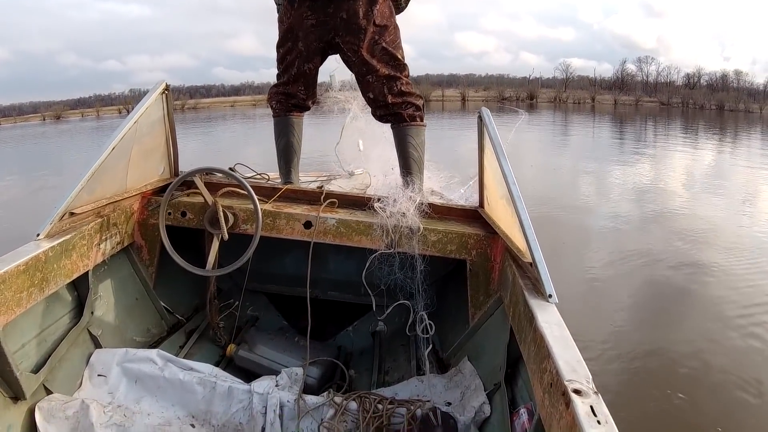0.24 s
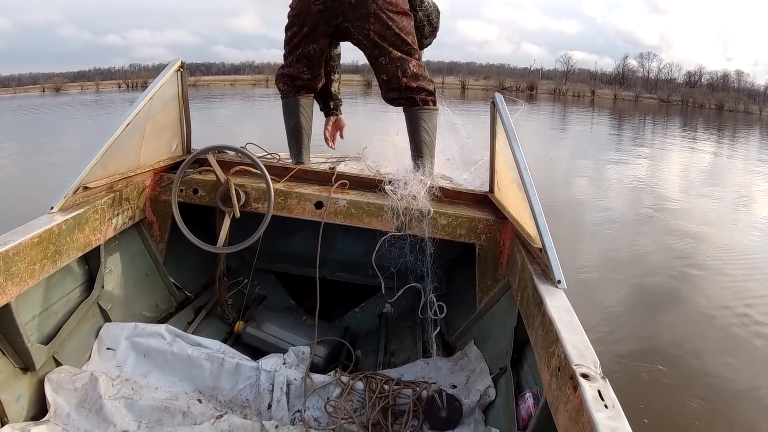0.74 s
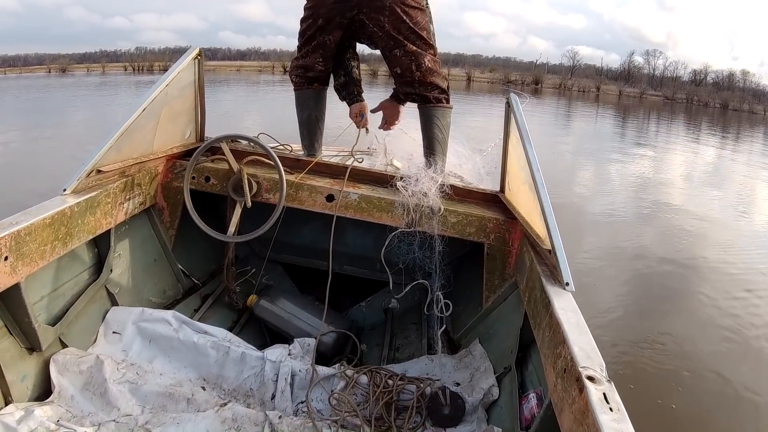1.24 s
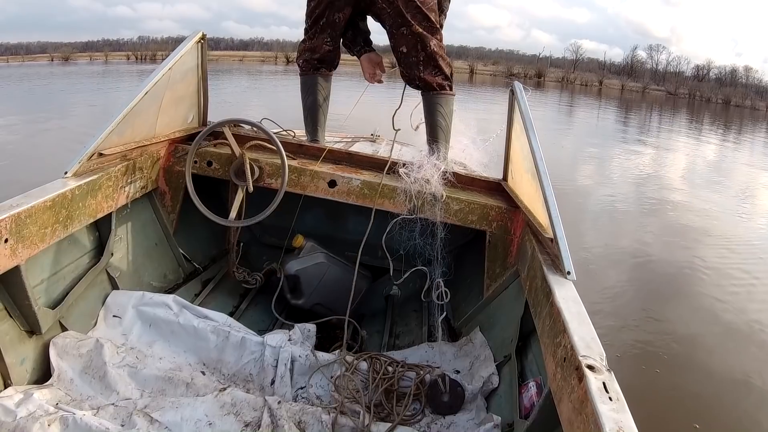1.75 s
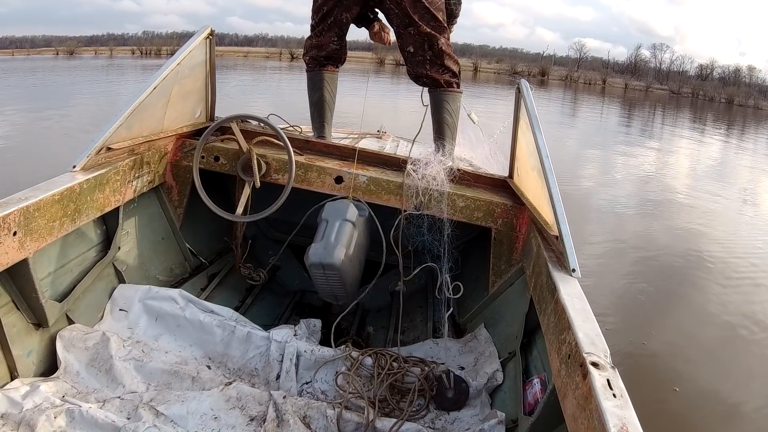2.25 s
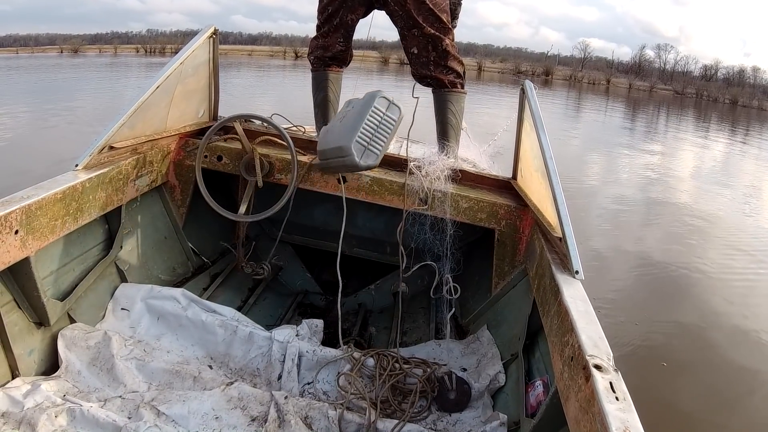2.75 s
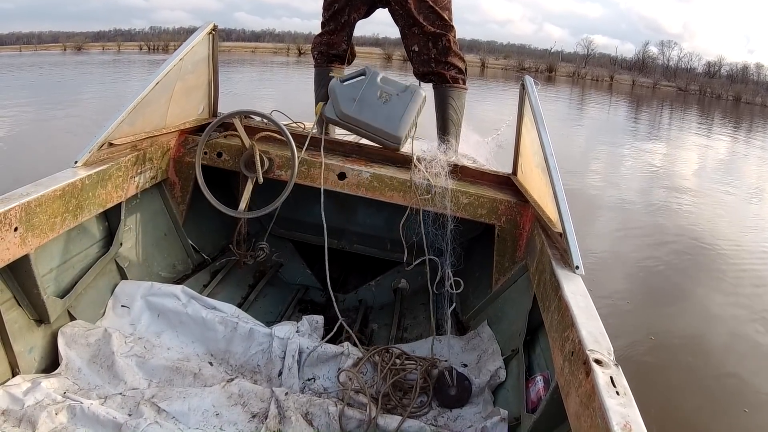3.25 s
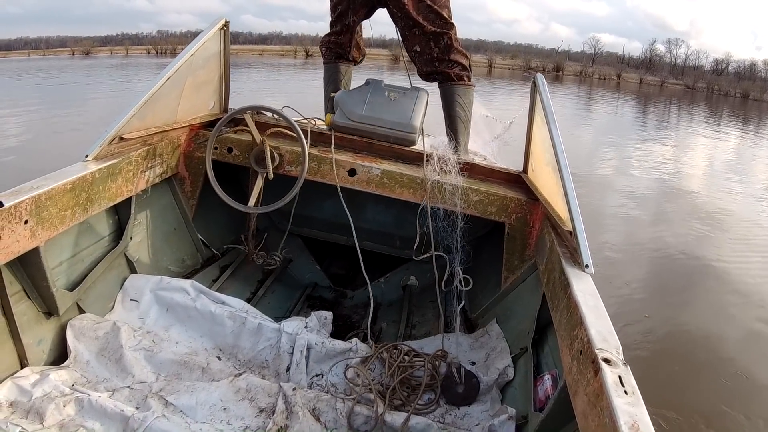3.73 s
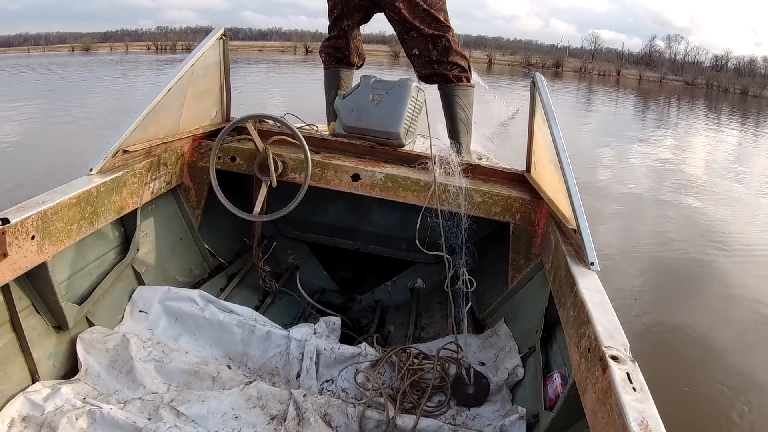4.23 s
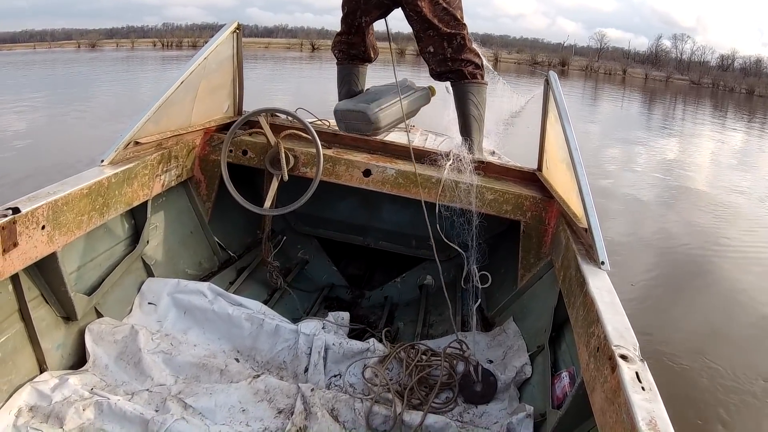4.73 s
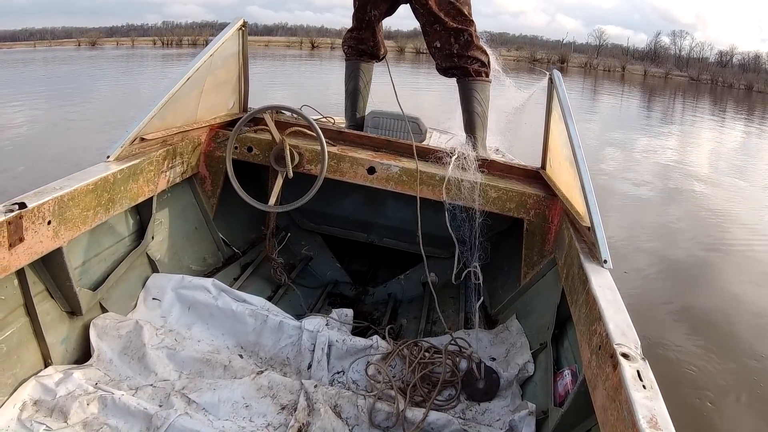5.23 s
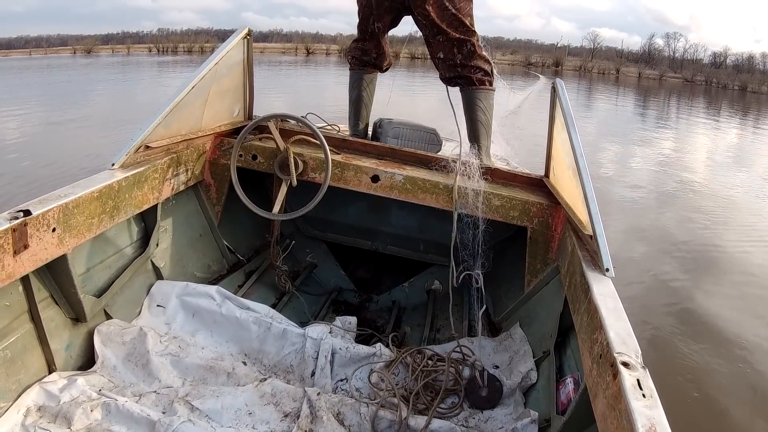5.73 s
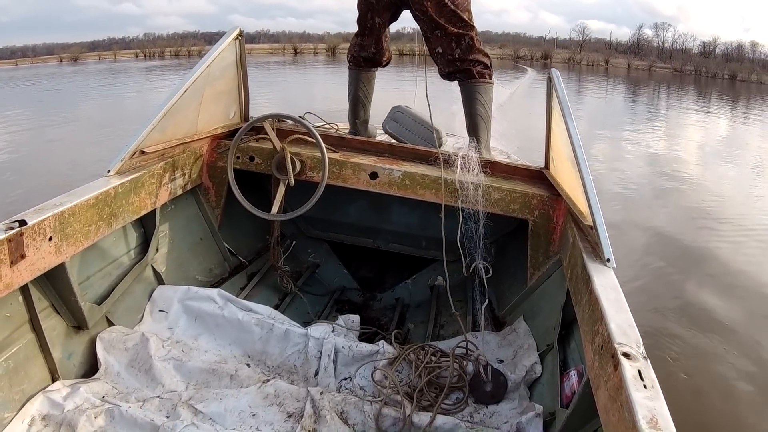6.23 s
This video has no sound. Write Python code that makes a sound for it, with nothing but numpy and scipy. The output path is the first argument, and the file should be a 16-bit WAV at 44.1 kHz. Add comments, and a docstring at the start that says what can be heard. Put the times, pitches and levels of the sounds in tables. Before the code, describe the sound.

A close microphone sits in a small metal boat on a calm river, with a faint steady hush and low, bubbling laps and gulps beneath the bow. From 0 to 1.8 s, wet net drips in a fast, uneven, bright patter, with soft dull flops and a faint boot bump near 0.6. Around 1.9 s a hollow plastic float stirs; sharp knocks hit at 2.2 and, loudest, 2.5 s, slightly distorted. From 3.1 to 3.9 s it clatters repeatedly, hollow and hard, with gritty dragging scrapes, strongest near 3.3 and 3.8. The dragging fades after 4 s; small wet flops come at 4.3 and 4.6, water gulps at 4.8 to 5. A boot thuds at 5.2 with light float taps, another bumps at 5.75, drops patter briskly, and a final hollow knock lands at 6.3 amid rising scraping to about 6.5 s.

```python
"""Wet net over the bow

A wet fishing net is paid out over the bow of a small metal boat. Its cord drags a hollow plastic float
out of the hull, knocking and scraping, while boots bump and wet net flops: random contacts ring filters and tones.
Drops patter off the net as short bursts of tiny contacts. The river laps as filtered noise, small
bubble tones and gulps, over a faint hush of noise. The hardest knocks overload the microphone."""
import sys
import numpy as np
from scipy import signal
from scipy.fft import rfft, irfft, next_fast_len
from scipy.io import wavfile
from scipy.ndimage import map_coordinates

SR = 44100
rng = np.random.default_rng(int(sys.argv[2]) if len(sys.argv) > 2 else 0)


def persist_wave(psi):
    """Save psi, clipped to +-1, as 16-bit WAV."""
    counts = np.round(np.clip(psi, -1, 1) * 32767).astype(np.int16)
    wavfile.write(sys.argv[1], SR, np.atleast_2d(counts).T)


N = 285768  # samples in the scene
SPAN = 32768  # samples in the frequency grid of every filter
TOP_HZ = 15850  # nothing is heard above this

# Table levels are starting points: the functions below add trims and chance.
# The float hits the boat: (time [s], level [dB], weight: boom over the level [dB],
# hardness: crack over the level [dB], basic time to fade by 60 dB [s])
FLOAT_KNOCKS = [(1.857, -49.5, -11.5, -8, 0.2), (2.173, -31.5, -25, -2, 0.18),
                (2.270, -45, -0.5, 8.5, 0.32), (2.295, -37.5, -9.5, -13, .32),
                (2.493, -26.5, -5.5, 0, 0.21), (2.678, -44.5, -4, 0, 0.23), (3.061, -49, -8.5, -5.5, .24),
                (3.116, -35.5, -12, 2, .13), (3.206, -49, -15, -7, .15), (3.263, -30, -17.5, -2.5, .19),
                (3.374, -34.5, -14, -10.5, 0.18), (3.428, -49, -5, -0.5, 0.37), (3.471, -47, 0, 6, 0.29),
                (3.616, -42, -26, -12, 0.25), (3.660, -37.5, -4.5, 6.5, 0.32),
                (3.839, -27.5, -22, -0.5, .2), (3.955, -51, -28, 0, .17), (5.216, -43, 1, -3.5, 0.19),
                (5.296, -48, 0, -44, 0.099), (5.328, -50.5, -2, -31, 0.13), (6.297, -32.5, -2, -1, .25)]
# Wet net flops on the deck: (time [s], level [dB], hollow ring over the level [dB],
# spray over the level [dB], rise [s])
NET_FLOPS = [(.272, -54, -24, -31, 0.018), (0.411, -49.5, -0.5, -18, 0.0073), (.530, -56.5, -3, -8, .025),
             (.558, -44, -1, -7.5, 0.013), (.736, -57, 0, -3.5, 0.0022), (.935, -53.5, -20, -10, 0.012),
             (1.025, -58.5, 2, -4.5, 0.01), (1.163, -56.5, -9, -15, 0.0061), (1.240, -61, 12, -25, 0.0087),
             (1.609, -48.5, -16, -14, .004), (2.129, -50, -31, -9, 0.007), (4.325, -56.5, -12, -5, 0.0015),
             (4.565, -49.5, -11, -12, 0.0045)]
# Boots shift and bump on the bow: (time [s], level [dB])
BOOT_STEPS = [(0.636, -62), (2.722, -50.5), (2.826, -60.5), (3.076, -60), (4.210, -66), (5.176, -42.5),
              (5.375, -61), (5.579, -60), (5.747, -46.5), (5.946, -60.5), (6.195, -52.5)]
# A boot's sound: (ring over the boom [dB], clack over the boom [dB], crack over the boom [dB])
STEP_TONE = (-4.5, -16, -14)
# Float and hull together, broad colour: (frequency [Hz], level [dB])
BODY_COLOUR = [(25, -23), (70, -22.5), (140, -18), (220, -7), (480, -6.5), (750, -2.5), (1050, -11),
               (1450, -13.5), (2100, -7.5), (3300, -14.5), (6200, -10), (7100, -20.5), (9500, -34.5),
               (15500, -38)]
# Float and hull together, resonances: (frequency [Hz], width [Hz], lift [dB])
BODY_MODES = [(80, 7, 8.9), (188, 29, 4), (246.6, 23, 5.2), (418, 8.8, 9.5), (602.6, 21, 6),
              (629, 20.4, 8.2), (768, 15, 6.6), (852, 59, 3.3), (948, 26, 2.6), (1176, 19, 5.3),
              (1649, 33, 3.3), (1717, 100, 3.1), (2014, 130, 3.6), (2182, 68, 4.3), (2300, 76, 6.3),
              (2470, 72, 0.43), (2740, 24, 1.5), (3204, 200, 3.8), (5120, 60, 4.4), (6050, 100, 5.2),
              (6160, 80, 1.8), (6470, 72, 4.5), (7600, 130, 10.4), (8220, 220, 11)]
# Thump, boom, ring, clack and crack: (from [Hz], to [Hz])
PART_BANDS = [(42, 140), (150, 480), (480, 1000), (1100, 3600), (3800, 20000)]
# Fade time of thump, boom, ring, clack and crack: (multiple of the blow's fade time [ratio])
PART_LIFE = [1.28, 1.69, 1.23, 1.04, 0.83]
# The hollow float's walls: (frequency [Hz], level [dB], time to fade by 60 dB [s])
FLOAT_WALLS = [(557.3, -11, 0.32), (648.6, -1, 0.095), (769.5, -4.5, 0.05), (836, -20, 0.13)]
# The hull's panels: (frequency [Hz], level [dB], time to fade by 60 dB [s])
HULL_PANELS = [(183, -6, 0.15), (245.2, -7, 0.29), (363.4, -4.5, 0.19)]
# The net slides out, now stronger, now almost silent: (time [s], level [dB])
NET_DRAG = [(0, -83), (.5, -71.5), (1.2, -73.5), (1.55, -83), (1.82, -64.5), (2.2, -71.5), (2.75, -69.5),
            (3.2, -65.5), (3.9, -57), (4.45, -67), (5.0, -81), (5.35, -69), (5.6, -93), (6.1, -70.5),
            (6.48, -60)]
# Float and mesh scrape over the deck: (time [s], length [s], level [dB])
DECK_SCRAPES = [(0.566, 0.12, -57), (2.243, .22, -53), (2.82, 0.12, -59), (3.317, 0.17, -51.5),
                (3.69, 0.037, -53), (4.092, 0.18, -59), (4.518, 0.11, -60.5), (5.173, 0.038, -49),
                (5.72, 0.04, -58.5), (6.212, 0.1, -57)]
# Broad colour of the sliding: (frequency [Hz], level [dB])
SLIDE_COLOUR = [(300, -24.5), (1000, 2.5), (1450, -3), (2200, 3.5), (3100, -3), (4800, 2), (6300, 3.5),
                (7200, -6), (10500, -23), (13500, -10), (16000, -22)]
# The fattest drops off the net: (time [s], level [dB], ping of the landing spot over the level [dB])
FAT_DROPS = [(.030, -41.5, -22.5), (0.164, -51.5, -11.5), (.313, -44, -12), (0.354, -50, -9),
             (0.768, -45.5, -16.5), (.819, -46.5, -8.5), (0.92, -48, -12), (0.969, -45.5, -11),
             (1.053, -55, -6), (1.138, -54, -7), (1.181, -46, -9), (1.227, -54, -10), (1.326, -53, -13),
             (1.48, -44.5, -11.5), (1.52, -50.5, -9), (1.712, -54, -2), (1.76, -44, -16.5),
             (1.918, -48, -14), (1.969, -45.5, -9), (2.012, -49.5, -15), (2.062, -50, -29),
             (2.434, -44, -21), (2.871, -42.5, -19.5), (2.911, -50.5, -10), (2.966, -44.5, -16),
             (3.014, -49.5, -10.5), (3.163, -40, -18), (4.373, -55, -12), (4.678, -51.5, -16),
             (4.88, -50, -22), (5.062, -55, -33), (5.116, -54, -11.5), (5.332, -48, -10),
             (5.378, -44.5, -18), (5.42, -52.5, -16), (5.514, -53.5, -5), (5.662, -48.5, -16),
             (5.705, -50.5, -9.5), (5.799, -56, -8.5), (5.901, -51.5, -11.5), (5.950, -48, -7.5),
             (5.993, -51, -17), (6.037, -54.5, -18), (6.08, -48, -10), (6.23, -40, -19), (6.275, -53, -2.5),
             (6.42, -46.5, -24), (6.47, -52.5, -6.5)]
# A drop's spatter, broad colour: (frequency [Hz], level [dB])
SPATTER_COLOUR = [(1200, -47), (2100, -9.5), (3000, -26.5), (4500, -3), (6400, -12), (8400, -14),
                  (10500, -25.5), (13500, -17), (16000, -19)]
# A drop's spatter, resonances: (frequency [Hz], width [Hz], lift [dB])
SPATTER_MODES = [(2150, 76, 22), (2260, 88, 13), (3340, 47, 8), (3400, 100, 21), (3637, 70, 20.6),
                 (4160, 62, 12.4), (4505, 76, 11), (4350, 39, 4.3), (4734, 56, 12), (4810, 56, 14.7),
                 (4960, 120, 8.4), (5610, 76, 15.3), (5710, 100, 5.7), (6250, 70, 12.5), (6248, 69, 8.5),
                 (6570, 130, 17.5), (7373, 73, 13.7), (7630, 130, 8.3), (8035, 75, 19)]
# Tones of the spot a drop lands on: (frequency [Hz], width [Hz], level [dB])
PING_MODES = [(2668, 51, 15), (2600, 19, -10), (2740, 34, 2)]
# Ripples under the bow: (time [s], level [dB], middle bubble pitch [Hz])
RIPPLES = [(0, -66.5, 603), (.3, -63, 591), (.62, -58, 525), (.88, -69, 624), (1.12, -75, 742),
           (1.35, -66, 691), (1.57, -71, 646), (1.75, -65, 686), (2.5, -57, 662.5), (2.87, -64.5, 632),
           (3.5, -57, 705), (4.45, -60.5, 702), (4.77, -55.5, 729), (5.0, -66.5, 711), (5.3, -58.5, 683),
           (5.55, -61, 663), (6.15, -66.5, 667.6), (6.48, -60.5, 706)]
# Single wavelets slosh against the bow: (time [s], length [s], level [dB])
WAVELETS = [(0.333, 0.069, -57.5), (0.661, 0.052, -53), (0.957, 0.15, -59), (1.164, .14, -54),
            (2.478, 0.055, -48), (5.028, 0.037, -58.5), (5.886, .03, -67)]
# Broad colour of the water's murmur: (frequency [Hz], level [dB])
MURMUR_COLOUR = [(35, -96), (60, -4), (141, -18), (177, -17.5), (243, -26), (292, -15), (385, -14),
                 (422, -1.5), (514, -28.5), (643, 7.5), (794, -2.5), (955, -18), (1400, -38), (1820, -77),
                 (3080, -120)]
# Air pockets that gulp under the bow: (time [s], pitch [Hz], level [dB])
AIR_GULPS = [(.069, 424, -62.5), (.17, 436, -66), (.36, 425, -59), (0.439, 427, -53), (.824, 439, -62.5),
             (1.344, 435, -66), (1.525, 430, -65.5), (4.763, 735, -56), (4.927, 434, -55),
             (5.045, 667, -60.5)]
# Broad colour of the hush over the water: (frequency [Hz], level [dB])
AIR_COLOUR = [(25, -23), (100, -9), (400, 0.5), (750, -8), (1300, -16.5), (2200, -8.5), (3500, -16.5),
              (6000, -15), (10000, -30), (15000, -22.5)]

# A knock of fade time CONTACT_T60 rises in CONTACT_S; a glancing blow both swells and lasts longer
CONTACT_S, CONTACT_T60 = 0.0016, 0.2  # seconds
CLACK_SHARE = 0.28  # of a knock's hardness also lifts the shell's clack
FLOP_BOOM_DB, FLOP_T60 = -13.5, 0.26  # boom over the ring; basic fade time in seconds
STEP_RISE_S, STEP_T60 = 0.011, 0.28  # seconds
SCRAPE_RISE_S, SCRAPE_T60 = 0.0067, 0.21  # seconds
LAP_RISE_S, LAP_T60 = 0.017, 0.15  # seconds
DROPS_PER_S = 20.2  # approximate beat of the trickle
SMALL_DROP_DB, SMALL_PING_DB, DROP_SCATTER_DB = -63.5, -12.5, 4.5  # the lesser drops in between


def knocks(wall_db=-1, rumble_db=-2.5, hollow_db=-1, thump_db=-14, heavy_db=-47):
    """Each blow shakes float and hull in five bands, and also rings the float's walls and hull's panels."""
    out = np.zeros(N)
    t = np.arange(SPAN // 2) / SR
    body = colour(BODY_COLOUR, BODY_MODES)
    responses = [ringing(body * band(lo, hi)) for lo, hi in PART_BANDS]
    for s, boom_db, ring_db, clack_db, crack_db, rise, t60 in blows():
        # the thump weakens faster than the boom below the heavy level
        deep_db = boom_db + thump_db + 0.5 * min(boom_db - heavy_db, 0)
        levels = [deep_db, boom_db, ring_db, clack_db, crack_db]
        parts = []
        for db, response, life in zip(levels, responses, PART_LIFE):
            envelope = strike(t, rise, t60 * life)
            parts.append(amp(db) * burst(envelope, response, per_second=12000))
        thump, boom, ring, clack, crack = parts
        rattle = through(clack + crack, spot(depth_db=2.5, spacing_hz=220))
        # a slow push barely rings the walls
        wall_gain = amp(ring_db + wall_db) / (1 + rise / 0.018)
        walls = chime(FLOAT_WALLS, t, rise) * wall_gain
        panels = chime(HULL_PANELS, t, rise) * amp(boom_db)
        low = thump + amp(rumble_db) * boom + amp(hollow_db) * ring
        add(out, s, low + rattle + walls + panels)
    return out


def blows():
    """Every contact with the boat, as (time, boom dB, ring dB, clack dB, crack dB, rise s, fade s)."""
    hits = []
    for s, db, weight, hardness, t60 in FLOAT_KNOCKS:
        rise = CONTACT_S * (t60 / CONTACT_T60) ** 2
        hits.append((s, db + weight, db, db + CLACK_SHARE * hardness, db + hardness, rise, t60))
    for s, db, hollow, spray, rise in NET_FLOPS:
        ring_db = db + hollow
        hits.append((s, ring_db + FLOP_BOOM_DB, ring_db, db, db + spray, rise, FLOP_T60))
    for s, db in BOOT_STEPS:
        hits.append((s, db, *(db + np.array(STEP_TONE)), STEP_RISE_S, STEP_T60))
    return hits


def chime(modes, t, rise):
    """Fading tones; the spot that is hit decides, here by chance, which speaks loudest."""
    total = np.zeros(len(t))
    for hz, db, life in modes:
        gain = amp(db + 3.5 * rng.standard_normal())
        tone = np.sin(2 * np.pi * (hz * t + rng.random()))
        total += gain * strike(t, rise, life) * tone
    return total


def sliding():
    """Wet mesh and plastic catch and slip over the deck in small grains, louder during each scrape."""
    level = strokes(NET_DRAG, DECK_SCRAPES, SCRAPE_RISE_S, SCRAPE_T60)
    catches = grains(N, per_second=1800) * amp(2.7 * wobble(70))
    scrape = unit(through(catches, ringing(colour(SLIDE_COLOUR, BODY_MODES))))
    return level * amp(1.15 * wobble(17)) * scrape


def drips(spatter_db=-9, ping_db=2, centre_s=0.0158, spread_s=0.0057):
    """Each drop swells into a brief spatter and pings the spot it lands on, never twice quite alike."""
    out = np.zeros(N)
    t = np.arange(SR // 8) / SR
    spatter = ringing(colour(SPATTER_COLOUR, SPATTER_MODES))
    splat = np.exp(-0.5 * ((t - centre_s) / spread_s) ** 2)
    for s, drop_db, spot_db in trickle():
        stretched = t * (1 + 0.012 * rng.standard_normal())  # shifts all ping pitches a little
        ping = np.zeros(len(t))
        for hz, width, db in PING_MODES:
            gain = amp(db + 3.3 * rng.standard_normal())
            t60 = np.log(1000) / (np.pi * width)  # a narrow resonance rings longer
            ping += gain * strike(t, 0.0016, t60) * np.sin(2 * np.pi * hz * stretched)
        landing = through(spatter, spot(depth_db=3, spacing_hz=500))
        add(out, s - 0.01, amp(drop_db + spatter_db) * burst(splat, landing, per_second=2400))
        add(out, s - 0.012, amp(drop_db + spot_db + ping_db) * burst(splat, ping, per_second=1400))
    return out


def trickle():
    """All drops as (time, dB, ping dB): small ones fill each gap between fat ones at an even beat."""
    drops = list(FAT_DROPS)
    for this, following in zip(FAT_DROPS, FAT_DROPS[1:]):
        beat_count = round((following[0] - this[0]) * DROPS_PER_S)
        for s in np.linspace(this[0], following[0], beat_count + 1)[1:-1]:
            db = SMALL_DROP_DB + DROP_SCATTER_DB * rng.standard_normal()
            drops.append((s, db, SMALL_PING_DB))
    return drops


def lapping(murmur_db=-4, bubble_db=-3, bubbles_per_second=80, swell_db=2, swells_per_second=9):
    """Ripples murmur against the hull, shedding small bubbles; now and then a pocket of air gulps."""
    when, _, pitch_hz = np.transpose(RIPPLES)
    t = np.arange(SPAN // 4) / SR
    bubbles = np.zeros(N)
    count = int(bubbles_per_second * N / SR)
    for index, (late, size, strength) in enumerate(rng.standard_normal((count, 3))):
        s = (index + 0.5 * late) / bubbles_per_second
        hz = np.interp(s, when, pitch_hz) * np.exp(0.102 * size)
        tone = strike(t, rise=0.0035, t60=0.26) * np.sin(2 * np.pi * hz * t)
        add(bubbles, s, amp(2 * strength) * tone)
    # the hollow under the bow passes only the middle pitches
    bubbles = unit(through(bubbles, ringing(band(357, 884, order=12))))
    water = ringing(colour(MURMUR_COLOUR) * band(120, 1100, order=3))
    murmur = unit(through(grains(N, per_second=990), water))
    level = strokes([row[:2] for row in RIPPLES], WAVELETS, LAP_RISE_S, LAP_T60)
    swell = amp(swell_db * wobble(swells_per_second))
    out = level * swell * (amp(murmur_db) * murmur + amp(bubble_db) * bubbles)
    for s, hz, db in AIR_GULPS:
        gulp = strike(t, rise=0.015, t60=0.089) * np.sin(2 * np.pi * hz * t)
        add(out, s, amp(db + 6.5) * gulp)
    return out


def river_air(db=-73):
    """The faint steady hush over open water: noise shaped by a fixed colour."""
    return amp(db) * unit(through(rng.standard_normal(N), ringing(colour(AIR_COLOUR))))


def cockpit(x, t60=0.054, share=0.16, count=16):
    """Close metal walls throw the treble straight back as a short, diffuse echo."""
    t = np.arange(SPAN // 4) / SR
    treble = band(1000, 20000, order=3)
    # share is the part of the treble's energy that comes by way of the walls
    out = through(x, ringing(np.sqrt(1 - share * treble ** 2)))
    tone = ringing(treble)
    # fresh random echoes blend into one another, so no single one colours the whole scene
    for place in np.linspace(0, N, count + 1):
        echo = through(rng.standard_normal(len(t)) * strike(t, 0.0011, t60), tone)
        echo = echo / np.linalg.norm(echo)
        near = np.sqrt(np.maximum(1 - np.abs(np.arange(N) - place) * count / N, 0))
        heard = np.flatnonzero(near)
        reflected = signal.fftconvolve((x * near)[heard], echo)
        add(out, heard[0] / SR, np.sqrt(share) * reflected)
    return out


def spot(depth_db, spacing_hz):
    """A new contact point favours some resonances and starves others."""
    place = np.fft.rfftfreq(SPAN, 1 / SR) / spacing_hz
    favour = map_coordinates(rng.standard_normal(256), [place], mode="mirror")
    gain = amp(depth_db * favour)
    return ringing(gain / np.sqrt(np.mean(gain ** 2)))


def strike(t, rise, t60):
    """Swell to 1 over the rise time, then fade by 60 dB in t60 seconds."""
    rise = max(rise, 1e-4)
    return np.minimum(t / rise, 1) * amp(-60 * np.maximum(t - rise, 0) / t60)


def strokes(curve, rows, rise, t60):
    """Gain over time: a slow level curve, with strokes that swell, hold and fade added as energy."""
    t = np.arange(N) / SR
    level = amp(np.interp(t, *np.transpose(curve)))
    for s, length, db in rows:
        fade_db = -60 * np.maximum(t - s - length, 0) / t60
        stroke = amp(db + fade_db) * np.clip((t - s) / rise, 0, 1)
        level = np.hypot(level, stroke)
    return level


def grains(size, per_second):
    """Tiny contacts of random strength at random moments."""
    return rng.standard_normal(size) * (rng.random(size) < per_second / SR)


def burst(envelope, response, per_second):
    """A flurry of contacts rings a body, with the energy of the envelope."""
    sound = through(envelope * grains(len(envelope), per_second), response)
    return unit(sound) * np.sqrt(np.mean(envelope ** 2))


def wobble(rate):
    """A smooth random curve through the given number of random points a second."""
    points = rng.standard_normal(int(N * rate / SR) + 4)
    return map_coordinates(points, [np.arange(N) * rate / SR])


def colour(points, modes=()):
    """Gain per frequency: a broad curve with resonance peaks on it."""
    hz = np.fft.rfftfreq(SPAN, 1 / SR)
    f, db = np.transpose(points)
    peaks = sum(lift / (1 + (2 * (hz - centre) / width) ** 2) for centre, width, lift in modes)
    return amp(np.interp(np.log(hz + 1), np.log(f), db) + peaks)


def band(lo, hi, order=6):
    """Gain per frequency of a band with soft edges."""
    hz = np.fft.rfftfreq(SPAN, 1 / SR) + 1
    low_edge = 1 + (lo / hz) ** (2 * order)
    high_edge = 1 + (hz / hi) ** (2 * order)
    return 1 / np.sqrt(low_edge * high_edge)


def ringing(gain):
    """Turn a gain per frequency into a ring that starts at once (minimum phase)."""
    cepstrum = irfft(np.log(np.maximum(gain, 1e-6)))
    # fold the half before time zero onto the half after it
    cepstrum[1:SPAN // 2] *= 2
    cepstrum[SPAN // 2 + 1:] = 0
    return irfft(np.exp(rfft(cepstrum)))[:SPAN // 4]


def through(x, response):
    """Play a force through a body that rings with this response."""
    return signal.fftconvolve(x, response)[:len(x)]


def amp(db):
    """Decibels to gain."""
    return 10 ** (np.asarray(db) / 20)


def unit(x):
    """Scale to an average (rms) strength of 1."""
    return x / np.sqrt(np.mean(x ** 2) + 1e-20)


def add(track, s, sound):
    """Mix a sound into a track at a time in seconds."""
    start = max(round(s * SR), 0)
    room = track[start:start + len(sound)]
    room += sound[:len(room)]


def scene():
    """Everything at one microphone in the boat; only the sounds on board echo off its walls."""
    on_board = knocks() + sliding() + drips()
    return (cockpit(on_board) + lapping() + river_air())[None]


def record(dry, ceiling_db=-30.0, hardness=5):
    """The microphone flattens the loudest peaks; nothing passes above the band limit."""
    clipped = dry / (1 + np.abs(dry / amp(ceiling_db)) ** hardness) ** (1 / hardness)
    size = next_fast_len(N + SPAN)
    passed = np.fft.rfftfreq(size, 1 / SR) < TOP_HZ
    return irfft(rfft(clipped, size) * passed, size)[:, :N]


dry = scene()
out = record(dry)
persist_wave(out)
```